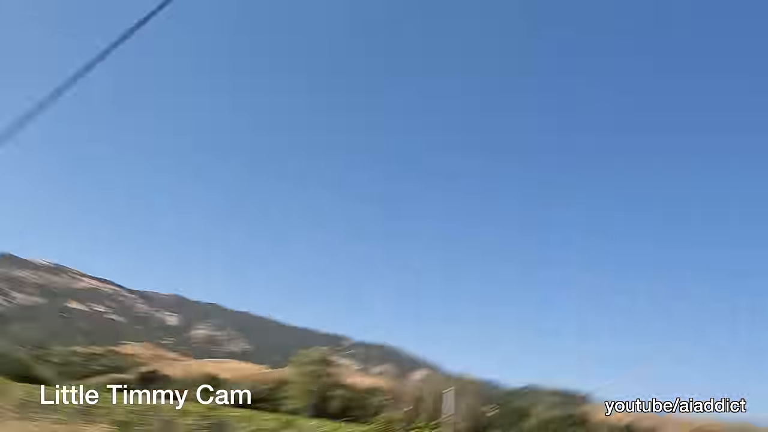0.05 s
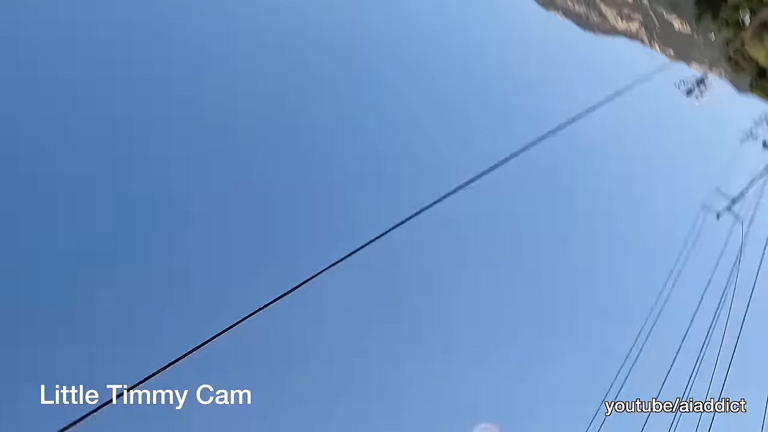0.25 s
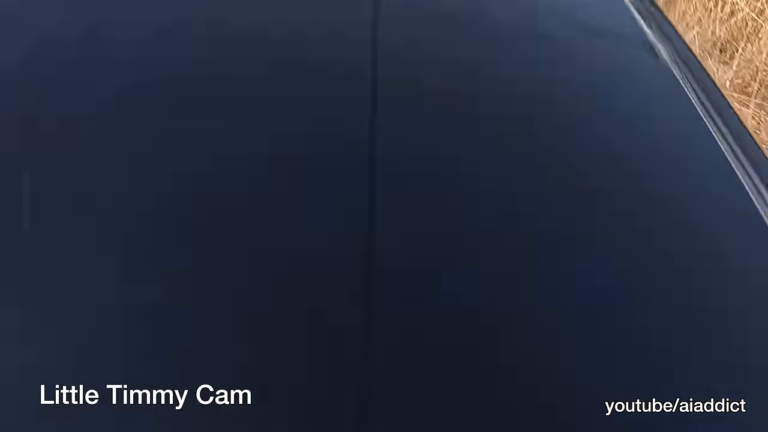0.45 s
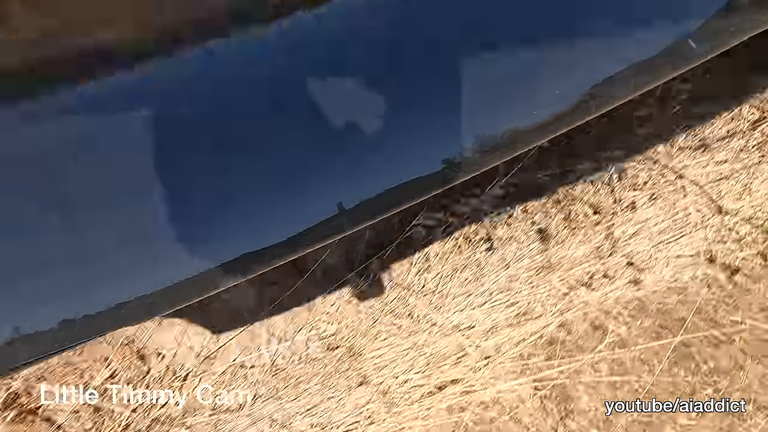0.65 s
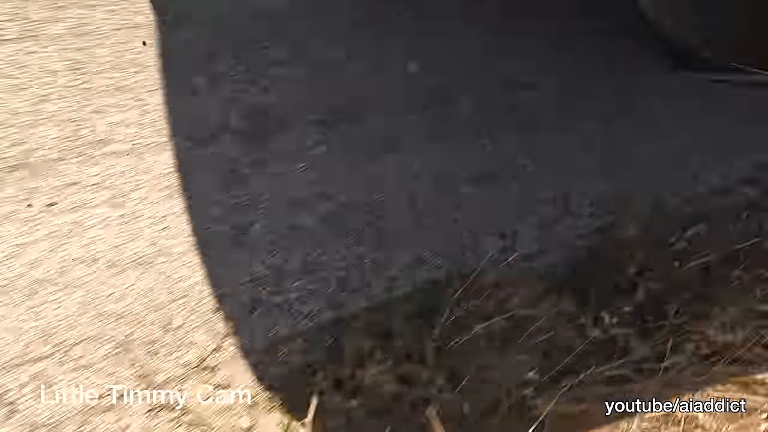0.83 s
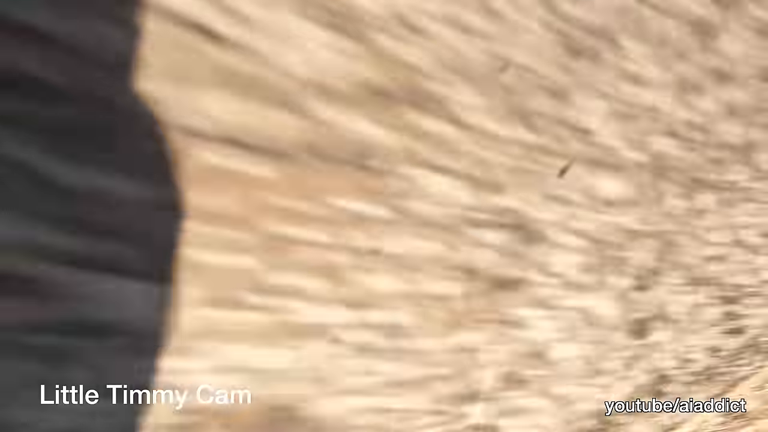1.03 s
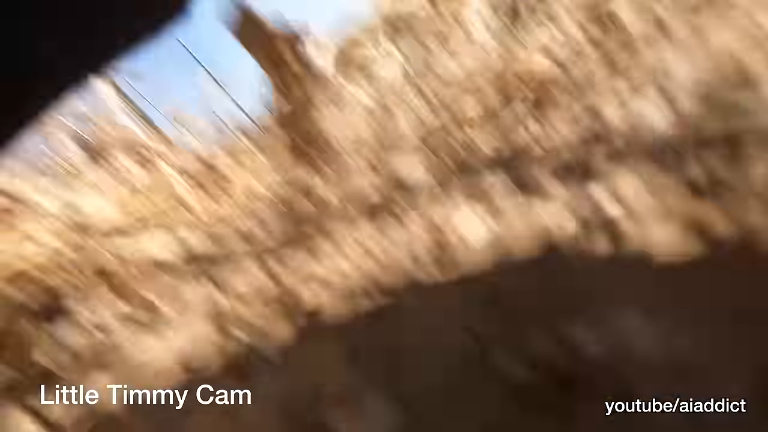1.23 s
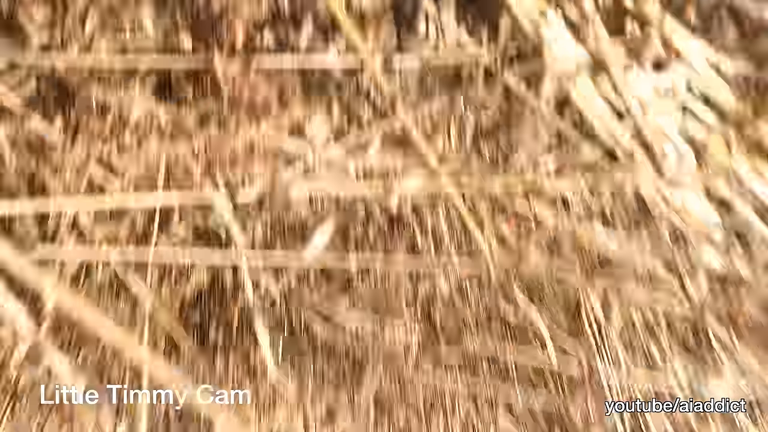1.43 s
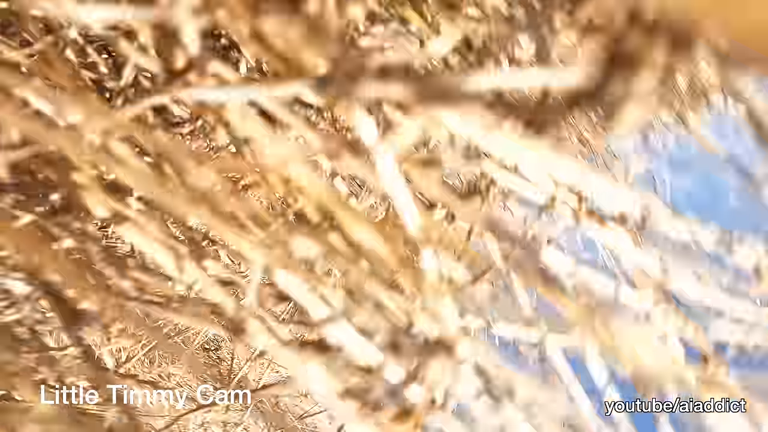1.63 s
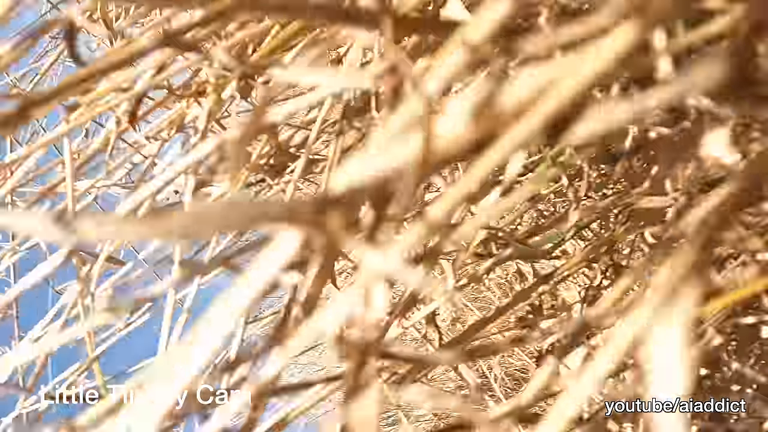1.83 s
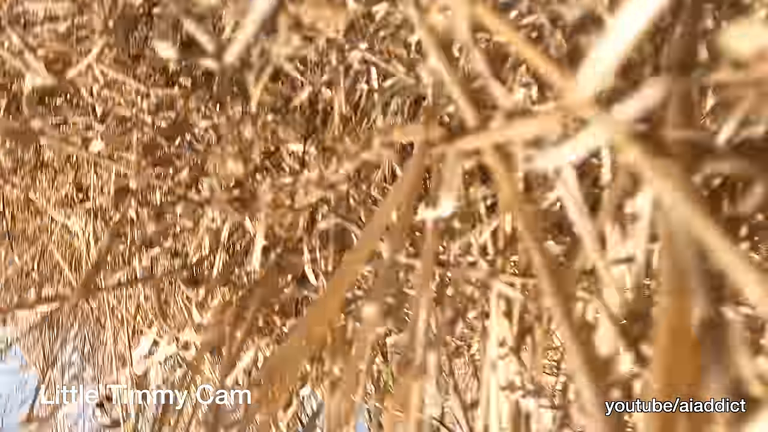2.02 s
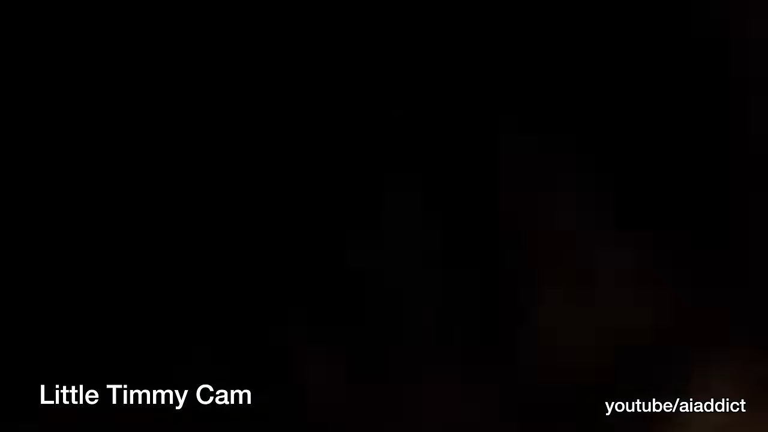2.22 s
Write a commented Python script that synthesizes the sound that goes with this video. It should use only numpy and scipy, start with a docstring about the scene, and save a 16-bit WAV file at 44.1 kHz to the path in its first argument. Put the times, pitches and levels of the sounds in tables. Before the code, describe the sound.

A small hard-cased camera tumbles over dry ground, knocking, thudding and scraping into straw

```python
"""Camera on a tumbling dummy

A small camera strapped to a dummy tumbles through the air and over dry ground into straw.
Shaped noise makes the wind; random grit clicks through resonances make the grinding.
Damped sines make knocks and thuds, narrow noise the singing skids, dense snaps the dry stalks."""
import sys
import numpy as np
from scipy import signal
from scipy.fft import rfft, irfft
from scipy.io import wavfile

SR = 44100
rng = np.random.default_rng(int(sys.argv[2]) if len(sys.argv) > 2 else 0)


def waveform_to_disk(signal):
    """Save audio, clipped to [-1, 1], as 16-bit WAV at the path in sys.argv[1]."""
    frames = np.transpose(np.atleast_2d(signal))
    scaled = np.clip(frames, -1, 1) * 32767
    samples = np.round(scaled).astype(np.int16)
    wavfile.write(sys.argv[1], SR, samples)


N = 100151

# upper modes of the housing: f/Hz, width/Hz, relative level while grinding/dB
SHELL_MODES = [(2102, 43, 1), (2654, 99, 14.5), (3200, 134, 3), (3482, 81, 8), (4248, 53, -1.5),
               (4880, 110, 7), (5510, 364, -8), (6830, 280, -4.5), (9080, 350, -0.5)]


def amp(db):
    """Gain of a level in dB."""
    return 10 ** (np.asarray(db, float) / 20)


def unit(x):
    """Scale to rms 1."""
    return x / np.sqrt(np.mean(x ** 2) + 1e-20)


def curve(rows, silent=None):
    """Interpolate each column of a table over time; silent replaces the ends."""
    s, *columns = np.transpose(rows)
    t = np.arange(N) / SR
    return [np.interp(t, s, c, silent, silent) for c in columns]


def colour(x, points):
    """Filter by a spectrum that falls 30 dB per octave outside its end points."""
    hz, db = np.transpose(points)
    f = np.maximum(np.arange(N // 2 + 1) * SR / N, 1)
    octaves_below = np.maximum(np.log2(hz[0] / f), 0)
    octaves_above = np.maximum(np.log2(f / hz[-1]), 0)
    gain_db = np.interp(np.log(f), np.log(hz), db) - 30 * (octaves_below + octaves_above)
    return irfft(rfft(x) * amp(gain_db), N)


def drift(rate_hz):
    """Slow random wander of rms 1: noise through two equal one-pole low-passes."""
    r = np.exp(-2 * np.pi * rate_hz / SR)
    noise = rng.standard_normal(N + SR)
    return unit(signal.lfilter([1], [1, -2 * r, r * r], noise)[SR:])


def grains(rate_per_s, spread_db):
    """Random clicks of either sign; exponential draws spread their sizes in dB."""
    sizes = amp(spread_db * np.minimum(rng.exponential(1, N), 4))
    signed = sizes * rng.choice([-1, 1], N)
    return signed * (rng.random(N) < rate_per_s / SR)


def resonance(x, hz, width_hz):
    """Two-pole resonance with peak gain 1."""
    r = np.exp(-np.pi * width_hz / SR)
    b = [(1 - r * r) / 2, 0, (r * r - 1) / 2]
    a = [1, -2 * r * np.cos(2 * np.pi * hz / SR), r * r]
    return signal.lfilter(b, a, x)


def add(out, s, x):
    """Mix a short sound in at a time in s."""
    i = max(int(s * SR), 0)
    out[i:i + len(x)] += x[:N - i]


def wind():
    """Air buffets the microphone port: lumpy rumble, rush and rush treble share one gust."""
    # t/s, rumble level/dB, rush level/dB, rush treble level/dB
    wind_levels = [(0, -18.5, -18.5, -66), (.07, -35, -52.5, -68), (.12, -23, -40, -54.5),
                   (.165, -20.5, -29.5, -43.5), (.21, -29.5, -39, -49), (.28, -30.5, -44, -57.5),
                   (.33, -24.5, -40.5, -60), (.37, -28, -35, -55.5), (.42, -23, -22.5, -48.5),
                   (.47, -26.5, -42, -64), (.52, -31.5, -41, -61), (.62, -18, -23.5, -37),
                   (.69, -31.5, -46, -68), (.73, -20.5, -40.5, -55.5), (.78, -22.5, -37, -50),
                   (.82, -31, -35.5, -49), (.86, -25, -29, -47), (.9, -23, -38, -54),
                   (.95, -26.5, -34.5, -59), (1.0, -26.5, -40, -59.5), (1.05, -31, -39.5, -56),
                   (1.13, -25.5, -55, -65), (1.19, -52, -54.5, -60), (1.23, -32, -46, -68),
                   (1.36, -27, -41.5, -78), (1.43, -34.5, -50.5, -53), (1.55, -39.5, -44.5, -68),
                   (1.68, -32, -42.5, -62), (1.8, -37, -59, -39), (1.88, -46.5, -92, -43),
                   (2.27, -38, -30, -41.5)]
    # spectra: f/Hz, relative level/dB
    rumble = [(8.8, -21), (15, 5.5), (155, -5), (266, -11.5), (295, -26), (336, -15.5), (500, -39.5),
              (650, -68), (1100, -120)]
    rush = [(150, -76), (250, -0.5), (431, -1.5), (491, -1), (650, -5.5), (833, -4), (1600, -20),
            (2080, -33.5), (3520, -120)]
    rush_treble = [(880, -27.5), (1500, -2), (1880, -1.5), (2480, -9.5), (8000, -40), (10400, -66),
                   (17600, -120)]
    gust_db, gust_hz = 2, 64
    gust = amp(gust_db * drift(gust_hz))
    out = np.zeros(N)
    for db, spectrum in zip(curve(wind_levels), (rumble, rush, rush_treble)):
        noise = colour(rng.standard_normal(N), spectrum)
        out += amp(db) * unit(noise * gust)
    return out


def modal_ring(x, level_db, modes):
    """Sum of modes, each swelling and sinking on its own; rms about 1 before level_db."""
    swing_db, swing_hz = 3.5, 25
    swung = [x * amp(db + swing_db * drift(swing_hz)) for _, _, db in modes]
    power = sum(np.mean(resonance(v, hz, w) ** 2) for v, (hz, w, _) in zip(swung, modes))
    out = np.zeros(N)
    for k, (v, (hz, width_hz, _)) in enumerate(zip(swung, modes)):
        out += (-1) ** k * resonance(amp(level_db) * v, hz, width_hz)  # alternate polarity
    return out / np.sqrt(power)


def grinding():
    """Dense grit clicks ring the housing during each ground contact."""
    # one table a contact: t/s, level/dB, treble re level/dB
    contacts = [
        [(0.0, -31, -17), (0.006, -36, 3.5), (0.016, -22.5, -3), (0.028, -22, -25), (0.05, -67, -13)],
        [(0.55, -37, -20), (0.582, -19.5, 2), (0.588, -7, -29), (0.597, -19.5, -8.5), (0.606, -5, -15),
         (0.614, -58, -26), (0.624, -26, -25), (0.638, -30.5, -9.5), (0.654, -9.5, -14.5), (0.66, -11.5, -19.5),
         (0.69, -72, 2)],
        [(1.04, -42, -17), (1.07, -15.5, -3), (1.09, -13, -12), (1.106, -18, 2), (1.112, -6, -16),
         (1.118, -23.5, -34), (1.126, -25.5, -10), (1.14, -25.5, -23), (1.16, -62, -9)],
        [(1.2, -57.5, 6), (1.23, -20.5, -1.5), (1.236, -23.5, -7.5), (1.288, -14.5, -12.5),
         (1.302, -17.5, -17.5), (1.312, -11.5, -13), (1.334, -16, -21.5), (1.35, -54.5, 12.5),
         (1.366, -30, -21), (1.42, -61, 6)],
        [(1.425, -38.5, -19), (1.445, -15.5, -8), (1.455, -14, -25), (1.463, -25, 4), (1.487, -26.5, -16.5),
         (1.505, -20, -16), (1.533, -35.5, 7), (1.545, -60, 7), (1.56, -51, -1)],
        [(1.57, -51, -4), (1.578, -36, -18), (1.6, -25, -8.5), (1.62, -13, -9.5), (1.63, -30, -5),
         (1.68, -30, -12)],
        [(1.68, -29, -17), (1.704, -12.5, -20), (1.718, -22.5, -13.5), (1.726, -9, -14.5), (1.734, -27, -9.5),
         (1.752, -20, -4), (1.788, -21.5, -4), (1.794, -20, -8), (1.814, -24.5, -13), (1.84, -32, -14)],
        [(1.84, -29.5, -17.5), (1.986, -29, -9.5), (2.004, -24, -14), (2.022, -22.5, -8), (2.036, -24, -10),
         (2.044, -21.5, -12.5), (2.215, -32, -16), (2.246, -15.5, -13), (2.254, -18.5, -32), (2.266, -25, -17)],
    ]
    # lower housing modes: f/Hz, width/Hz, relative level/dB
    housing_modes = [(224, 160, -10), (401, 308, -3), (628, 208, 0.5), (850, 188, -1.5), (1060, 115, 0),
                     (1316, 840, -8), (1570, 370, -8)]
    # treble spectrum: f/Hz, relative level/dB
    housing_treble = [(1180, 2.5), (2000, 0.5), (2600, -8.5), (4300, -7.5), (6000, -18.5), (7600, -20.5),
                      (9500, -35.5), (11000, -44.5), (13000, -48), (15400, -57)]
    grit_per_s, grit_spread_db = 2500, 3
    cracks_per_s, crack_spread_db, crack_share = 250, -0.5, 0.4
    chatter_db, chatter_hz = 2.0, 110  # the contact skips and grips
    body_cut_hz, shell_db, treble_trim_db = 2500, -6, -2

    rows = []
    for table in contacts:
        rows.append((table[0][0] - .002, -90, -20))
        rows.extend(table)
        rows.append((table[-1][0] + .002, -90, -20))
    level_db, treble_db = curve(rows)
    level_db = level_db + chatter_db * drift(chatter_hz)
    top_db = level_db + treble_db

    grit = unit(grains(grit_per_s, grit_spread_db))
    cracks = unit(grains(cracks_per_s, crack_spread_db))
    bright = unit(colour(grit + crack_share * cracks, housing_treble))
    low_pass = signal.butter(3, body_cut_hz, fs=SR, output="sos")
    body = signal.sosfilt(low_pass, modal_ring(grit, level_db, housing_modes))
    shell = amp(shell_db) * modal_ring(bright, top_db, SHELL_MODES)
    return body + shell + amp(top_db + treble_trim_db) * bright


def thuds():
    """Each body thud is a heavily damped low sine."""
    # t/s, level/dB, f/Hz
    landings = [(.002, -24, 59.4), (0.583, -9, 243), (0.653, -27, 77), (0.655, -5, 244), (1.086, -5.5, 220),
                (1.095, -14.5, 50.6), (1.103, -7.5, 172), (1.292, -18, 160), (1.31, -12, 56.5),
                (1.315, -12, 224), (1.617, -12.5, 78.4), (1.62, -11, 226), (1.699, -20, 68.4),
                (1.705, -15.5, 190), (2.243, -15, 49), (2.244, -14.5, 226), (2.255, -6.5, 126)]
    decay_cycles, rise_cycles = 4.3, 0.14  # to -60 dB; time constant
    out, t = np.zeros(N), np.arange(6000) / SR
    for s, db, hz in landings:
        decay = 2 * amp(db - 60 * t * hz / decay_cycles)
        rise = 1 - np.exp(-t * hz / rise_cycles)
        add(out, s, decay * rise * np.sin(2 * np.pi * hz * t))
    return out


def knocks():
    """Damped housing ring plus a noise tick that excites the upper modes; a thin part rings once."""
    # t/s, level before trim/dB, f/Hz, tick re knock before trim/dB, cycles to -60 dB (2 at least)
    hits = [(0.01, -4.5, 900, -3.5, 5.3), (0.024, -5, 882, -17, 16.2), (0.055, -24, 824, -23, 16),
            (0.091, -18.5, 975, -9, 10.5), (0.584, 2.5, 1000, -5.5, 10.7), (0.6, -9, 1104, -4.5, 9.1),
            (0.604, -22, 910, -30, 6.9), (0.621, -3.5, 970, -14, 12.5), (0.652, -2, 680, -10, 4.7),
            (0.704, -34, 425, -2.5, 6), (0.835, -12.5, 974, -10, 18), (1.086, 0.5, 1090, -6, 16.6),
            (1.095, 1, 740, -14, 5.5), (1.109, -3, 784, -16, 21.5), (1.133, -13.5, 426, -2.5, 11.6),
            (1.229, -3, 1000, -10.5, 19), (1.243, -6.5, 995, -13.5, 17), (1.25, -5, 800, -20, 13),
            (1.26, -4, 950, -10.5, 13), (1.274, -4.5, 940, -7, 15), (1.281, 2, 870, -12.5, 11.5),
            (1.312, -3, 470, -7.5, 9.7), (1.362, -11.5, 885, -21, 6.2), (1.445, -9.5, 546, -8, 6.3),
            (1.461, -9, 565, -0.5, 8), (1.527, -21, 860, 1, 4.6), (1.617, -2.5, 913, -9, 11.3),
            (1.647, -20.5, 650, 4.5, 15), (1.702, 0.5, 754, -29, 11.6), (1.723, -2.5, 660, -26, 7),
            (1.753, -17, 700, 7, 6), (1.792, 0, 950, -13.5, 9.4), (1.878, -10.5, 962, -8.5, 8.1),
            (1.913, -20, 754, -7, 16), (1.956, -19.5, 630, -0.5, 16), (2.003, -11, 642, -10, 18.5),
            (2.031, -8.5, 620, 2, 14.4), (2.093, -17.5, 560, -7.5, 15), (2.111, -17.5, 560, -17, 12),
            (2.225, -9, 800, -10, 6.3), (2.246, -4, 532, -6, 8.7), (2.252, 7.5, 480, -20, 2.4)]
    # tick spectrum: f/Hz, relative level/dB
    tick_spectrum = [(1500, 4.5), (4000, -12), (8000, -26.5), (12000, -39.5), (15500, -50)]
    # thin part struck: t/s, level/dB
    after_rings = [(1.14, -51)]
    # thin part modes: f/Hz, relative level/dB, t60/s
    thin_part = [(1720, 6, 0.14)]
    knock_trim_db, tick_trim_db = -2, -11
    contact_s, tick_rise_s, tick_s = 0.0016, 0.0005, 0.0027  # time constants
    tail_s, tail_db = 0.012, -13  # slower rattle after the tick
    tick_ring_db, tick_ring_spread_db = 1.5, 6

    out, t = np.zeros(N), np.arange(6000) / SR
    noise = unit(colour(rng.standard_normal(N), tick_spectrum))
    rise = 1 - np.exp(-t / contact_s)
    tick_decay = np.exp(-t / tick_s) + amp(tail_db) * np.exp(-t / tail_s)
    tick_shape = (1 - np.exp(-t / tick_rise_s)) * tick_decay
    draws = rng.standard_normal((len(hits), len(SHELL_MODES)))
    strengths = amp(tick_ring_db + tick_ring_spread_db * draws)

    for (s, db, hz, tick_db, cycles), gains in zip(hits, strengths):
        decay = amp(-60 * t * hz / max(cycles, 2))
        add(out, s, amp(db + knock_trim_db) * 2 * rise * decay * np.sin(2 * np.pi * hz * t))
        noise_here = np.roll(noise, -int(s * SR))[:len(t)]
        tick = amp(db + tick_db + tick_trim_db) * tick_shape * noise_here
        ring = sum(g * resonance(tick, f, w) for g, (f, w, _) in zip(gains, SHELL_MODES))
        add(out, s, tick + ring)
    for s, db in after_rings:
        for hz, mode_db, t60 in thin_part:
            decay = amp(db + mode_db - 60 * t / t60)
            add(out, s, rise * decay * np.sin(2 * np.pi * hz * t))
    return out


def skids():
    """A panel sings as it skids: narrow noise with its envelope flattened swells, then stops."""
    # start t/s, length/s, f/Hz, level/dB
    songs = [(.558, .028, 2500, -19), (.565, .018, 760, -18), (.562, .022, 3350, -30),
             (.562, .022, 4300, -35), (1.054, .028, 3250, -21), (1.05, .035, 4400, -30),
             (1.068, .025, 1750, -19), (1.688, .025, 1900, -29), (1.75, .012, 2150, -20),
             (1.998, .06, 1620, -28), (2.1, .07, 2700, -38)]
    width_hz, swell_power = 53, 0.79
    out = np.zeros(N)
    for s, length_s, hz, db in songs:
        x = np.linspace(0, 1, int(length_s * SR))
        tone = resonance(rng.standard_normal(8192), hz, width_hz)
        tone = tone / np.abs(signal.hilbert(tone))
        tone = tone[2000:2000 + len(x)]  # past the filter's start
        swell = x ** swell_power * np.minimum(8 * (1 - x), 1)
        add(out, s, amp(db) * tone * swell)
    return out


def stalks():
    """Dry stalks: band-passed snaps over hiss, drawn separately for the two microphones."""
    # t/s, level/dB
    crackle_levels = [(1.04, -100), (1.066, -66), (1.086, -48), (1.196, -100), (1.218, -57), (1.282, -51),
                      (1.326, -60), (1.406, -100), (1.46, -67), (1.498, -70), (1.532, -58), (1.566, -91),
                      (1.608, -56), (1.714, -73), (1.752, -55), (1.816, -64), (1.936, -71), (2.026, -58.5),
                      (2.198, -71), (2.252, -48.5), (2.264, -66)]
    snaps_per_s, snap_spread_db, hiss_share = 1200, 5.0, 0.92
    low_hz, high_hz = 11300, 15500
    db, = curve(crackle_levels, -120)
    band = signal.butter(3, [low_hz, high_hz], "band", fs=SR, output="sos")
    channels = []
    for _ in range(2):
        snaps = unit(grains(snaps_per_s, snap_spread_db))
        crackle = snaps + hiss_share * rng.standard_normal(N)
        channels.append(unit(signal.sosfilt(band, crackle)))
    return amp(db) * np.array(channels)


def muffle(x):
    """The body covers the microphone for a moment: zero-phase treble loss."""
    from_s, to_s, corner_hz = 0.54, 0.7, 5900
    t = np.arange(N) / SR
    dull = signal.sosfiltfilt(signal.butter(1, corner_hz, fs=SR, output="sos"), x)
    return np.where((t > from_s) & (t < to_s), dull, x)


def stereo_side(mid):
    """Difference between the microphones: a lagging share of mid, set in two bands."""
    # t/s, bass side re mid/dB, treble side re mid/dB
    narrowing = [(0, -12, -4), (.15, -21, -6), (.5, -42.5, -11), (.66, -33.5, -22.5), (1.0, -85, -26),
                 (1.8, -69, -41), (2.2, -72, -44)]
    split_hz, lag_s = 2700, 0.00094
    late = np.roll(mid, int(lag_s * SR))
    side = np.zeros(N)
    for db, kind in zip(curve(narrowing), ("low", "high")):
        band = signal.butter(4, split_hz, kind, fs=SR, output="sos")
        side += amp(db) * signal.sosfilt(band, late)
    return side


def scene():
    """Nearly mono mix with a faint steady hiss; the stalks alone are independent per channel."""
    hiss_db = -79
    hiss = amp(hiss_db) * rng.standard_normal(N)
    mid = muffle(wind() + grinding() + thuds() + knocks() + skids() + hiss)
    return mid + stereo_side(mid) * np.array([[1], [-1]]) + stalks()


def record(dry):
    """Lowest bass rolls off, tanh rounds the peaks, a steep low-pass cuts the top."""
    bass_cut_hz, top_cut_hz = 14, 16100
    dry = signal.sosfilt(signal.butter(1, bass_cut_hz, "high", fs=SR, output="sos"), dry)
    rounded = 1.23 * np.tanh(dry / 1.165)
    return signal.sosfilt(signal.cheby2(12, 70, top_cut_hz, fs=SR, output="sos"), rounded)


dry = scene()
out = record(dry)
waveform_to_disk(out)
```